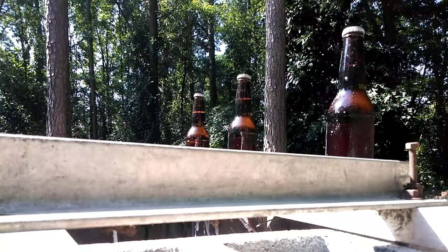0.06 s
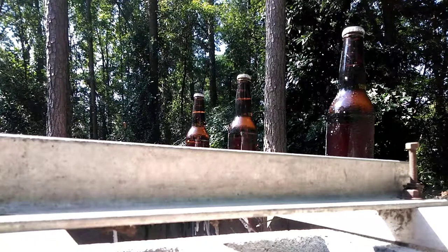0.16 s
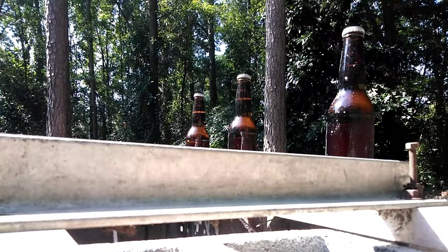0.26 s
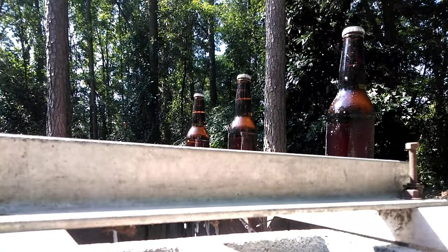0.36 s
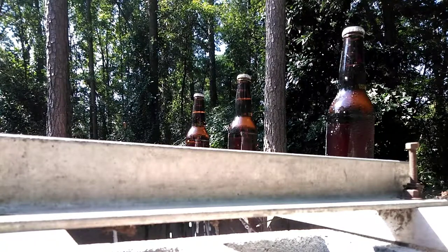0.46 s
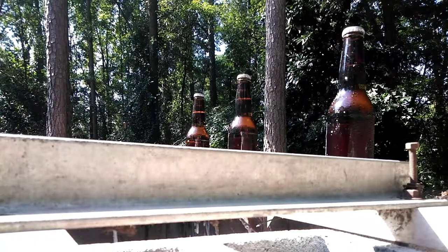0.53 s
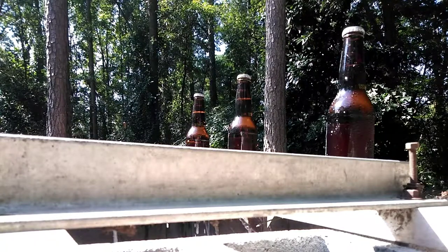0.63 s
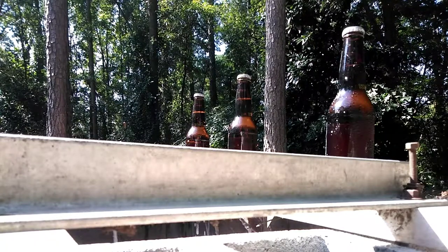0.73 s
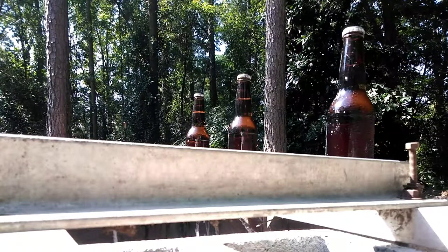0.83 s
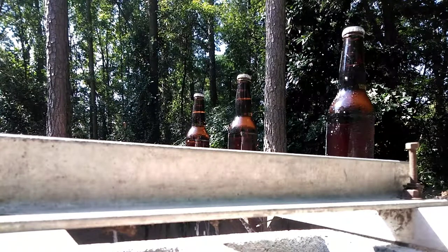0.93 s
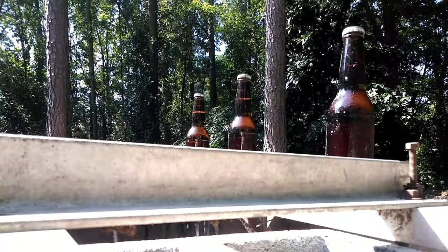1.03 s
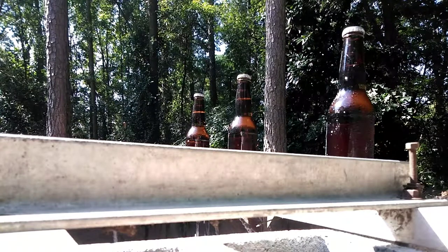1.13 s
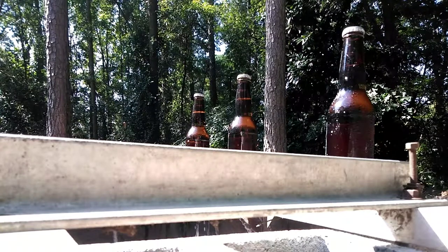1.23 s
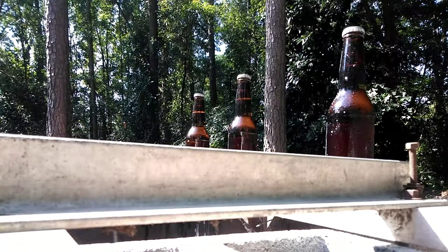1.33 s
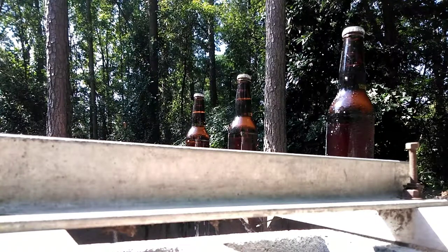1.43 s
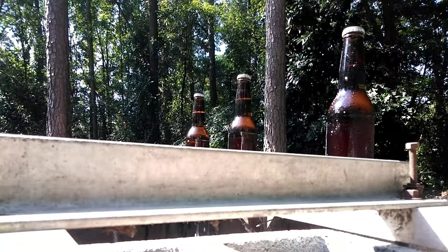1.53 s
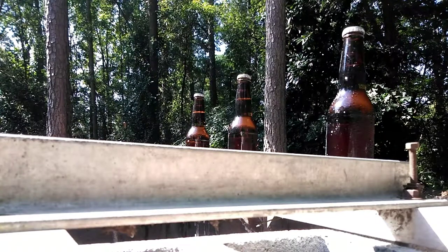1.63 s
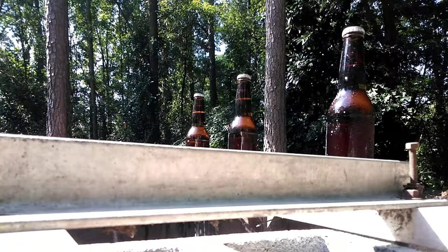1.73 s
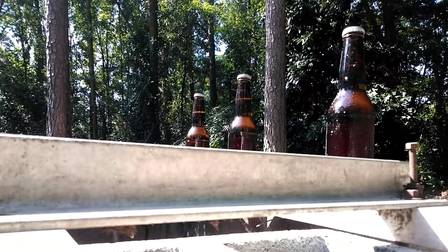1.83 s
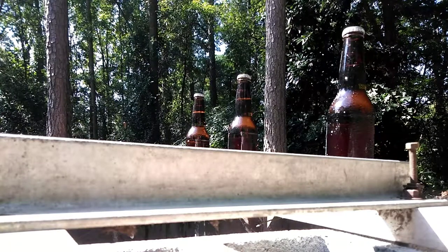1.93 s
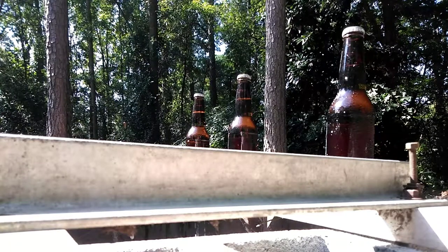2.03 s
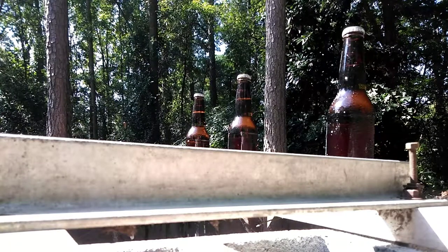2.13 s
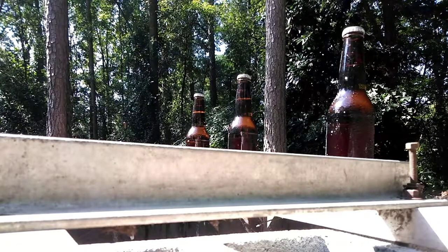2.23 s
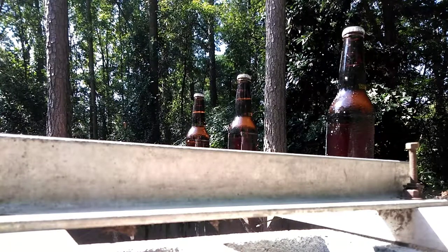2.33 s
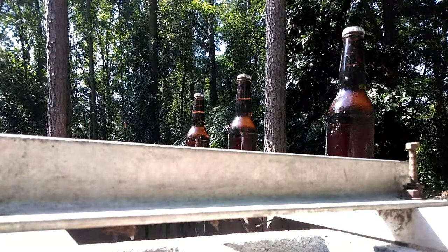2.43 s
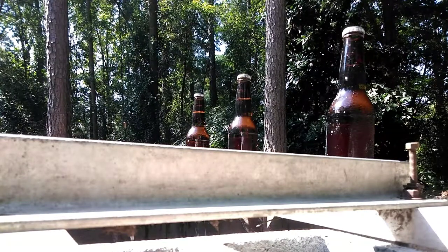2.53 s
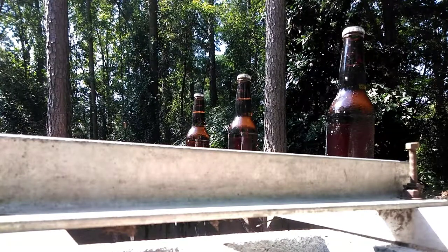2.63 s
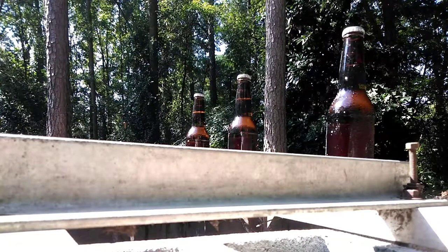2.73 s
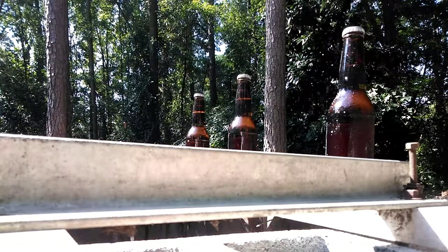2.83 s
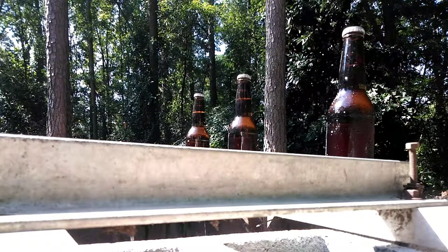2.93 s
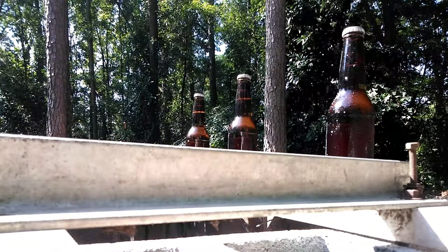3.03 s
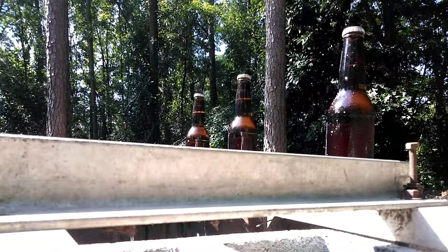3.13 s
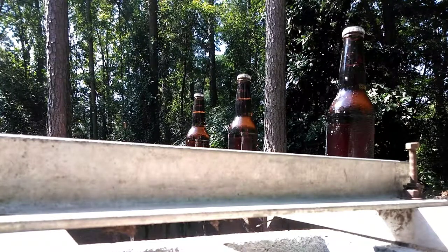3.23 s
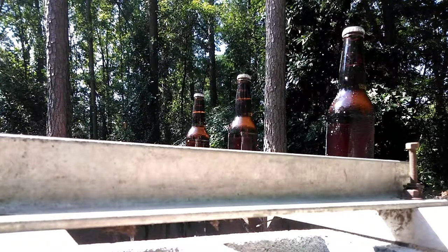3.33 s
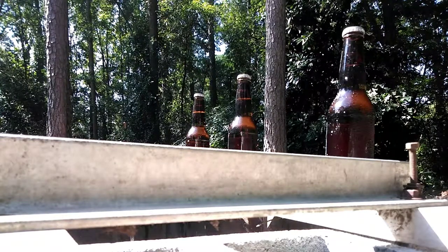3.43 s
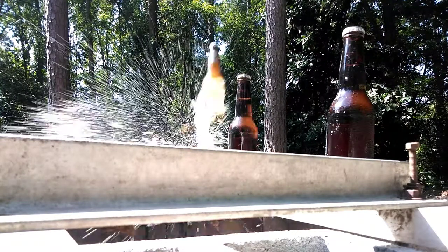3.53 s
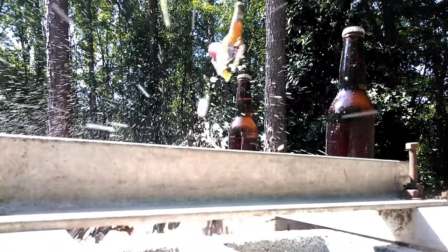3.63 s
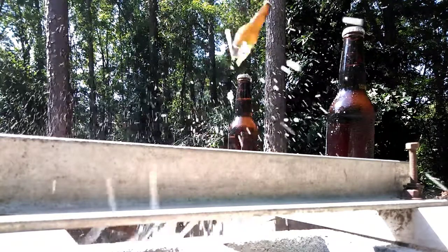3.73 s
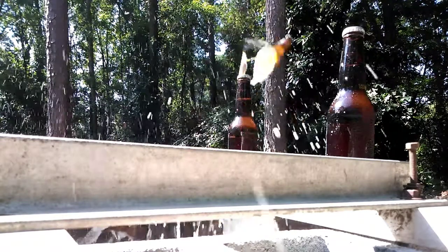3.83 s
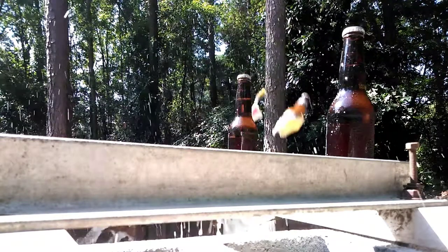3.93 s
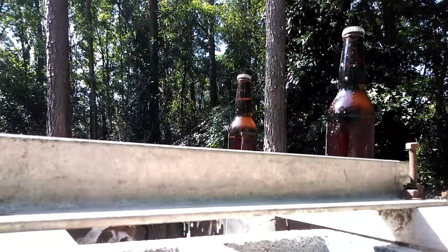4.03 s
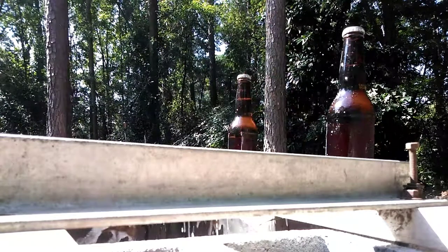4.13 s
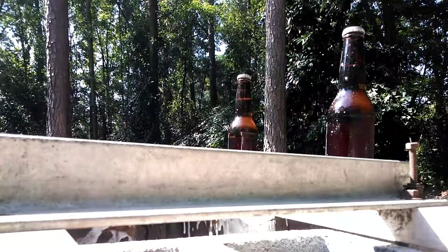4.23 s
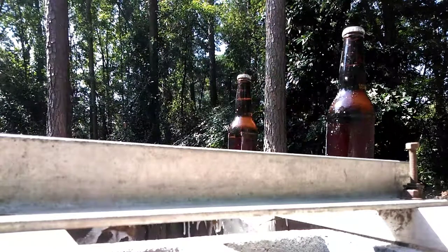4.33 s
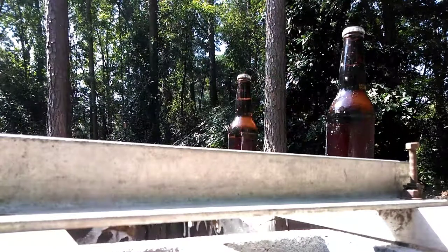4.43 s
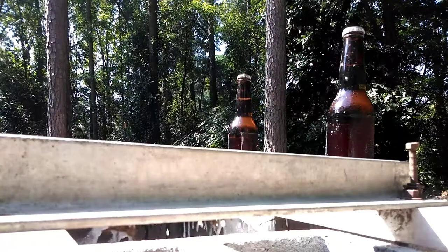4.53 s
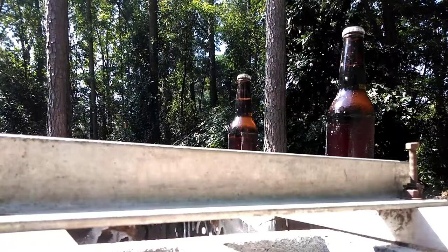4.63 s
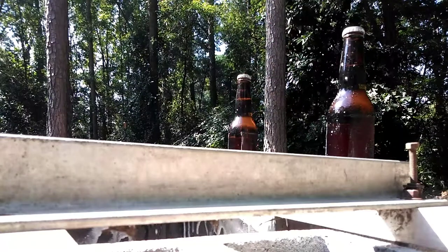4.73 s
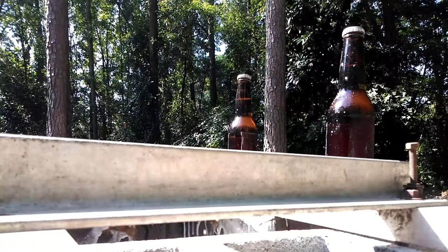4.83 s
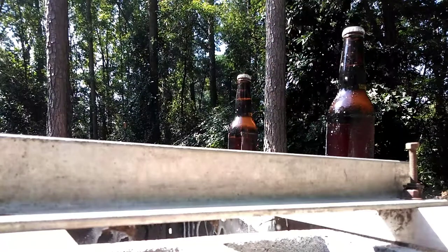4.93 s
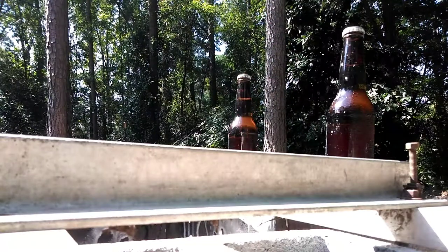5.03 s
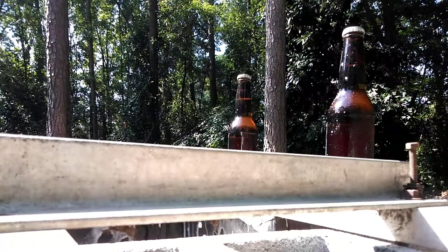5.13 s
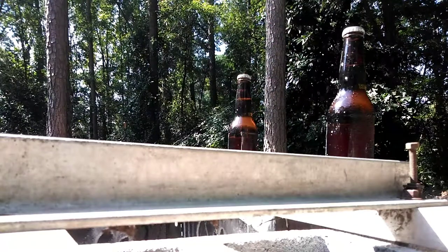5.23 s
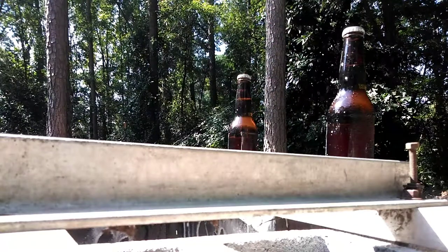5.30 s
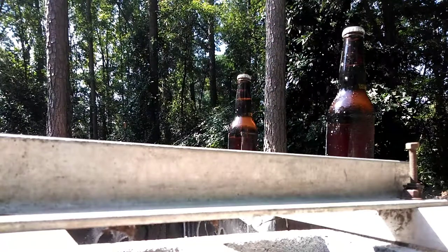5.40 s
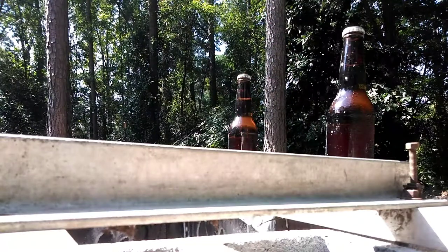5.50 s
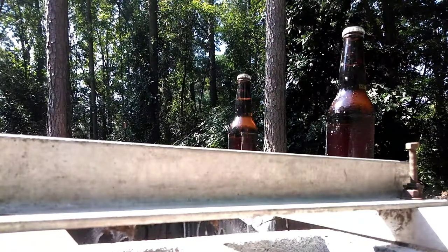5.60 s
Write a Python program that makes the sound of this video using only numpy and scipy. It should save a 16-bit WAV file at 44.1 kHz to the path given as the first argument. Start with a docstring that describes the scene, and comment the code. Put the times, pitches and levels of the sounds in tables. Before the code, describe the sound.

In a quiet wood with faint hum, distant traffic and thin cicadas, an air pistol snaps at about 2.4 seconds and echoes off the trunks. A second shot follows at 3.65 and a full glass bottle bursts at once, loud, bright and wet. Shards rain down, the neck clacks at 4.35, a thick piece bounces at 4.5, and one last tick comes near the end. Close stereo microphone near the bottles, briefly overloaded on the right.

```python
"""In a wood, an air pistol fires twice: the first pellet misses, the second bursts a full glass bottle on a rail.
Gas puffs are fading noise. The burst is a hail of tiny clicks plus cracks, ringing glass, splashes and thuds.
Tree trunks answer with a scattered noise echo, and the blast briefly pins the right microphone capsule.
Behind lie filtered noise for air, far traffic, leaves and cicadas, a hum of wavering sines, and soft distant knocks.
"""
import sys
import numpy as np
from scipy import signal
from scipy.fft import rfft, irfft
from scipy.io import wavfile
from scipy.ndimage import uniform_filter1d

SR = 44100
rng = np.random.default_rng(int(sys.argv[2]) if len(sys.argv) > 2 else 0)


def bounce(signal):
    """Save signal as a 16-bit WAV file at the path given by the first command-line argument."""
    frames = np.transpose(np.atleast_2d(signal))
    limited = np.clip(frames, -1, 1)
    pcm = np.round(limited * 32767).astype(np.int16)
    wavfile.write(sys.argv[1], SR, pcm)


N = 249606
T = np.arange(N) / SR  # time [s]
SPAN = SR // 4  # samples of a short sound
SIDES = np.array([[.5], [-.5]])  # shares a left-minus-right level between the two sides

# pistol shots: (time [s], right capsule free again after [s], level change building up until then [dB])
SHOTS = [(2.3712, .039, 12), (3.6512, .035, -12)]
# gas blast and near reflections: (time after the shot [s], level [dB], fall by 60 dB [s], left minus right [dB])
BLAST = [(0, -12, .02, -10), (.0035, 3, .025, 0), (.0065, 2, .03, 0), (.011, 2, .03, 0),
         (.0172, 3, .015, 0), (.020, -5, .06, 0), (.123, -13, .008, 6), (.045, -9, .02, 3),
         (.08, -14, .015, -2), (.147, -24, .015, 2)]
# tone of the blast: (frequency [Hz], relative level per hertz [dB])
BLAST_TONE = [(60, -31.5), (150, -20.5), (500, -10), (1100, -10), (2400, -11), (4500, -10.5), (7500, -9),
              (8700, -4.5), (11000, -13), (14800, -16.5), (16300, -35)]
SHOT_DB = -5  # added to every blast level

# hail of bursting and raining glass: (time [s], level before it sings [dB], left minus right [dB])
SHATTER = [(3.685, -48.5, 2), (3.73, -18.5, 0.5), (3.8, -26.5, -14.5), (3.825, -15, -14), (3.863, -32, -1),
           (3.943, -45.5, 0), (4.143, -50, -9), (4.199, -61, -9.5), (4.34, -48.5, -3)]
# tone of the glass clicks: (frequency [Hz], relative level per hertz [dB])
SHATTER_TONE = [(59, -57), (100, -26), (284, -11), (586, -12), (652, -23), (1040, -14.5), (1260, -3),
                (1560, -22.5), (4940, -6), (5270, -1), (8790, 4.5), (15000, -18.5), (16300, -34)]
BURST_CLICKS_PER_S, RAIN_CLICKS_PER_S, CLICK_T60_S = 1500, 1000, .0003
# drink splashing: (time [s], level [dB])
SPLASH = [(3.685, -34.5), (3.731, -19), (3.8, -50), (3.863, -31), (3.943, -44.5), (4.07, -69), (4.143, -51),
          (4.2, -103.5), (4.34, -83.5)]
# ringing modes of the bottle glass: (frequency [Hz], level [dB], fall by 60 dB [s])
BOTTLE_MODES = [(2336, -17.5, .1), (2600, -19.5, .08), (3080, -23.5, .08), (3420, -24, 0.2),
                (4080, -18.5, 0.2), (4397, -20.5, .14), (4940, -12.5, .2), (5580, -19, .1),
                (5990, -12.5, .13), (7250, -15.5, .12), (7890, -13.5, .1), (8680, -0.5, .1),
                (9426, -10, .08), (10880, -4, 0.065), (14100, -12.5, 0.052)]
# while it bursts, glass sings at those frequencies: gain of modes, gain of plain clatter, width of a mode
SING_DB, CLATTER_DB, SING_WIDTH_HZ = 8, -14, 55
SING_UNTIL_S, SING_LONGER_S = 3.93, .01  # only cracks before this time and longer than this sing
# loudest cracks of the burst: (time [s], level before tone [dB], fall by 60 dB [s], left minus right [dB])
CRACKS = [(3.6874, -4, 0.0063, 10), (3.6933, -4, 0.0119, 13.5), (3.7012, -9.5, 0.0164, 8.5),
          (3.715, -11.5, 0.021, 5.5), (3.734, -2, 0.053, 6), (3.7482, -7.5, 0.0236, -0.5),
          (3.7637, -2, 0.0091, 4.5), (3.7785, 5, 0.00543, 3.5), (3.7832, -4.5, 0.01115, 6.5),
          (3.7933, -9, .022, -0.5), (3.7991, -4, 0.014, -2.5), (3.8158, -4.5, 0.023, -3),
          (3.8215, -6, 0.024, -0.5), (3.8281, -8, 0.026, -1), (3.8415, -5, 0.0063, 0)]
# lesser cracks at random: earliest, latest, level of the loudest, fall by 60 dB
LESSER_FROM_S, LESSER_TO_S, LESSER_DB, LESSER_T60_S = 3.7, 3.85, -13.5, 0.016
# the full bottle gives each crack a low part that thins as it empties
WET_DB, WET_LOSS_DB_PER_S = -27.5, 91
# shards landing: (time [s], level before tone [dB], low part [dB], fall by 60 dB [s], left minus right [dB])
LANDINGS = [(3.88, -9, -46, 0.0031, 4.5), (3.925, -19.5, -44, 0.022, 5),
            (3.9666, -20.5, -38.5, 0.0038, 3.5), (3.985, -33, -50, .006, 0.5),
            (4.021, -37.5, -58, 0.0052, -2.5), (4.0403, -36, -51.5, 0.0071, -5.5),
            (4.076, -34, -61.5, 0.0074, -1.5), (4.098, -37, -59, 0.0092, -12),
            (4.1203, -45, -51, 0.029, -15.5), (4.1445, -35.5, -59.5, 0.028, -15.5),
            (4.1903, -48, -53.5, 0.0425, -13), (4.26, -45.5, -63, 0.02487, -11),
            (4.306, -51, -66, 0.039, -3), (4.5018, -54, -36, 0.0062, 9.5), (4.5339, -25, -59, 0.06, 11.5),
            (4.5357, -19, -51.5, 0.02, 7.5), (5.4143, -30.5, -66.5, 0.017, -1.5),
            (5.418, -46, -75.5, 0.19, -3)]
# small shards: lowest and highest pitch, middle ring time, level against the hail table
TINKLE_HZ, TINKLE_T60_S, TINKLE_DB = (1841, 11550), 0.05, -5.5
# large shards struck so that they ring: (time [s], level of the mode set [dB], left minus right [dB])
RINGS = [(3.715, -22, 4.5), (3.742, -19.5, 3), (3.785, -15.5, 8.5), (3.816, -13.5, 15), (3.824, -6.5, -3.5),
         (3.836, -18.5, 9.5), (3.862, -28.5, -0.5), (3.9, -30, 7)]
# bottle neck landing and rocking: (time [s], level before tone [dB], fall by 60 dB [s], left minus right [dB])
NECK = [(4.3526, -11.5, 0.026, 7.5), (4.3566, -7, 0.014, 0), (4.363, -23, 0.097, -1.5),
        (4.386, -33, 0.019, -1)]
# tone of the neck: (frequency [Hz], relative level per hertz [dB])
NECK_TONE = [(300, -18.5), (800, -14.5), (1200, -19.5), (2100, -15), (2900, -2.5), (3500, -9), (4800, -13),
             (5700, -5.5), (6100, -6), (6600, -4), (8800, 3), (11000, -7.5), (15000, -18.5), (16300, -37)]
# thick piece bouncing on the rail:
# (time [s], level [dB], share of free ring time [ratio], brightness [dB per octave], left minus right [dB])
BOUNCES = [(4.501, -25, 0.54, 3, 8), (4.508, -29, 0.27, -8, -3), (4.5351, -25, 0.88, 4, 2.5),
           (4.547, -29.5, 1.3, -2, 0)]
# modes of a freely ringing thick piece: (frequency [Hz], level [dB], fall by 60 dB [s])
PIECE_MODES = [(1138, -13, 0.061), (1383, -3.5, 0.14), (1562, 0.5, 0.12), (1880, -5, 0.06),
               (2358, 4, 0.046), (2780, -4.5, 0.084), (2984, -8.5, 0.066), (3470, -18.5, 0.028)]
PIECE_DETUNE = .006  # typical chance shift of each mode, as a fraction of its pitch
BOUNCE_SCRAPE_DB = 9  # contact noise, added to the bounce level
# tiny splinters ringing on the rail: (time [s], level [dB], left minus right [dB])
SPLINTERS = [(3.9654, -16, -7.5), (4.128, -33, -18), (4.1465, -28.5, -11.5), (4.259, -31, -22),
             (4.458, -36, -18), (4.484, -31, -14)]
SPLINTER_HZ, SPLINTER_T60_S = 14800, 0.0325
# low thuds of shots, burst and heavy pieces:
# (time [s], level [dB], frequency [Hz], fall by 60 dB [s], left minus right [dB])
THUDS = [(2.377, -20.5, 134, 0.053, 8.5), (2.491, -27, 300, 0.025, -3.5), (2.378, -22, 170, .07, 4),
         (3.657, -22, 130, .06, 6.5), (3.687, -9, 87, 0.071, -9.5), (3.693, -6.5, 154.6, 0.067, 4),
         (3.838, -32, 485, 0.052, 2.5), (3.856, -33.5, 388, 0.049, 3.5), (3.876, -35.5, 575, 0.09, 4),
         (3.887, -27.5, 238, .04, -1), (3.8915, -27.5, 252, 0.04, 3), (3.903, -31.5, 370, .05, 0),
         (4.3525, -8.5, 490, 0.018, 3), (4.3528, -17, 755, 0.012, 1), (4.357, -15, 366, .03, -3),
         (4.356, -30, 174, 0.14, -5), (4.372, -35.5, 199, 0.09, -4), (4.39, -35, 512, 0.039, -2),
         (4.402, -36, 207, 0.036, 1.5), (4.505, -45, 514, 0.19, 7)]
# drink slapping down: (time [s], level [dB], frequency [Hz], left minus right [dB])
SLAPS = [(3.995, -35, 2759, 7), (4.043, -37.5, 800, 0.5), (4.058, -46.5, 1120, 6.5),
         (4.075, -44, 898, -2.5), (4.092, -44.5, 1040, 0), (4.105, -52, 770, 1), (4.119, -39.5, 2020, -8),
         (4.13, -36, 7170, -4.5), (4.14, -61, 1110, -1.5), (4.194, -47.5, 5230, -8.5)]
SLAP_T60_S = 0.066
# drops of drink: the span of time, loudest level at its start and end, fall by 60 dB, pitch range
DROPS_FROM_S, DROPS_TO_S, DROPS_FIRST_DB, DROPS_LAST_DB, DROP_T60_S = 4, 4.2, -39, -53, 0.0243
DROP_HZ = 499, 5060
# fine spray pattering nearby: (time [s], level [dB])
SPRAY = [(3.86, -57), (3.93, -42), (4.0, -50), (4.15, -53), (4.25, -58), (4.34, -57), (4.4, -52),
         (4.5, -57), (4.6, -58), (4.72, -73)]
SPRAY_HZ = 12440, 15600

# echo of the trunks before it builds and thins: (frequency [Hz], level [dB], fall by 60 dB [s])
WOOD = [(150, -24, 0.87), (500, -12.5, 0.21), (1550, -17.5, 0.36), (2800, -15.5, 0.48), (4073, -14, 0.5),
        (5830, -12.5, 0.57), (7300, -11.5, 0.77), (9350, -9.5, 0.34), (11400, -10, 0.28), (14700, -11, 0.5),
        (15000, -8.5, 0.36)]
# side from which the echo arrives: (time after the sound [s], left minus right [dB])
ECHO_PAN = [(0, -0.5), (.04, -0.5), (.108, 1.5), (.125, -3.5), (.17, -4)]
# the echo builds until the main stand of trunks answers, then thins down to a lowest level
NEAREST_DB, STAND_S, STAND_DB, THIN_DB_PER_S, THINNEST_DB = -8, 0.034, 3, 20.5, -0.2
LUMPY_DB, PATCHY_DB = 6, 5  # chance swing for uneven spacing of trunks, and of whole clumps
# past the far edge of the near trunks the lower echo drops away
EDGE_S, EDGE_HZ, EDGE_DB = 0.12, 2600, -5.5
# the pistol stands further off than the glass, so more of it is echo
SHOT_ECHO_DB, GLASS_ECHO_DB = -20, -31

# soft far knocks: (time [s], level before the band filter [dB], left minus right [dB])
KNOCKS = [(0.62, -48.5, -7), (0.666, -55, -4), (1.392, -46.5, 3), (1.998, -54, -11), (2.725, -44.5, 3),
          (3.572, -44.5, 5), (4.958, -50.5, -1)]
KNOCK_HZ, KNOCK_T60_S = 460, .045
# far traffic swelling: (time [s], level [dB])
TRAFFIC = [(0, -74), (.98, -68.5), (1.3, -67), (1.45, -61), (1.55, -62.5), (1.68, -60), (1.85, -64),
           (2.14, -66), (3.4, -63), (4.95, -63.5), (5.66, -65.5)]
# leaf swishes climbing as they swell: (time of the peak [s], peak setting [dB], frequency at the peak [Hz])
LEAVES = [(.26, -71.5, 2613), (.56, -69.5, 3385), (.87, -69, 3294)]
# swell before the peak, fall after it, climb in pitch, roughness of the noise
STIR_DB_PER_S, STIR_END_DB_PER_S, STIR_HZ_PER_S, STIR_WIDTH_HZ = 21, 250, 5300, 690
# hum partials: (middle frequency [Hz], middle level [dB])
HUM = [(59.2, -55.5), (91.5, -74), (118.4, -68.5), (177.6, -73.5), (242.2, -81.5)]
CICADA_HZ, CICADA_WIDTH_HZ, CICADA_DB = 7106, 780, -65
# tone of the still air: (frequency [Hz], relative level per hertz [dB])
AIR_TONE = [(25, -15.5), (45, -10), (62, -6), (90, -9), (160, -19.5), (650, -23), (1560, -34.5),
            (3100, -34.5), (5250, -43), (8500, -37), (10500, -43.5), (14500, -44.5), (16300, -64.5)]
AIR_DB = -59
# how alike left and right air are: (frequency [Hz], likeness, below 0 counting as 0 [0-1])
LIKENESS = [(60, 1), (130, 1), (290, 0.8), (640, 0.7), (1410, -0.1), (3100, 0.5), (6820, 0), (15000, 0.03)]
LEFT_LATE_S = .0005  # air, traffic, leaves and hum reach the right port first

# left and right sound port resonances: (frequency [Hz], width [Hz], lift [dB])
PORTS = [(9054, 800, 6.5), (7700, 2500, 3)]
# right capsule under the blast, each state lasting to the next row:
# (time after the shot [s], offset before it drains [share of full scale], sound let through [dB])
PINNED = [(.0045, .45, -4), (.0056, -.25, -20), (.0102, -.2, -7), (.0114, .3, -22), (.0168, .1, -7),
          (.0186, -.05, -28)]
COUPLING_HZ, RUMBLE_CUT_HZ, TOP_HZ = 40, 45, 15900


def undb(db):
    """Turn decibels into a gain."""
    return 10 ** (np.asarray(db) / 20)


def unit(x):
    """Scale to an rms of 1."""
    return x / np.sqrt(np.mean(x ** 2))


def on_log(hz, table, column=1):
    """Read a table column by straight lines along log frequency."""
    table = np.array(table, float)
    return np.interp(np.log(np.maximum(hz, 1)), np.log(table[:, 0]), table[:, column])


def colour(x, table):
    """Shape the tone by a table, keeping the average power of white noise."""
    gain = undb(on_log(np.fft.rfftfreq(N, 1 / SR), table))
    return irfft(rfft(x) * unit(gain), N)


def high_pass(x, order, hz):
    """Remove what lies below a frequency."""
    return signal.sosfilt(signal.butter(order, hz, "high", fs=SR, output="sos"), x)


def band(x, lo_hz, hi_hz):
    """Keep what lies between two frequencies."""
    sos = signal.butter(2, [lo_hz, min(hi_hz, .45 * SR)], "band", fs=SR, output="sos")
    return signal.sosfilt(sos, x)


def fade(t60, size=SPAN):
    """Decay that passes -60 dB at t60 seconds."""
    return undb(-60 * T[:size] / t60)


def walk(rate):
    """Slow smooth wandering around zero, with about `rate` new values a second."""
    k = int(SR / rate)
    steps = np.repeat(rng.standard_normal(N // k + 1), k)
    return 0.54 * uniform_filter1d(uniform_filter1d(steps, k), k)[:N]


def add(out, s, sound, db, pan_db):
    """Place a mono or stereo sound at a time, level and side."""
    i = int(s * SR)
    sound = (sound * undb(db + pan_db * SIDES))[:, :N - i]
    out[:, i:i + sound.shape[1]] += sound


def puff(t60, rise=.0005):
    """Decaying noise, unrelated at the two ports."""
    return rng.standard_normal((2, SPAN)) * fade(t60) * np.minimum(T[:SPAN] / rise, 1)


def ring(modes, rough_db):
    """Damped partials with chance phases; contact makes each one flutter."""
    out, size = 0, 2 * SPAN
    for hz, db, t60 in modes:
        turn = rng.random((2, 1))
        flutter = uniform_filter1d(rng.standard_normal((2, size)), 200) * np.sqrt(200)
        tone = np.sin(2 * np.pi * (hz * T[:size] + turn))
        out = out + undb(db + rough_db * flutter) * fade(t60, size) * tone
    return out * np.minimum(T[:size] / .001, 1)


def bump(hz, t60, skirt_db=-3.5, rise_cycles=.5):
    """Soft blow: one round partial with a rough skirt of noise."""
    tone = -np.sin(2 * np.pi * hz * T[:SPAN])
    skirt = undb(skirt_db) * unit(band(rng.standard_normal((2, SPAN)), hz / 1.6, hz * 1.8))
    return (tone + skirt) * fade(t60) * np.minimum(T[:SPAN] * hz / rise_cycles, 1)


def pistol():
    """Each shot: gas puff of fading noise, then its near reflections."""
    out = np.zeros((2, N))
    for s, *_ in SHOTS:
        for late, db, t60, pan_db in BLAST:
            add(out, s + late, puff(t60), SHOT_DB + db, pan_db)
    return colour(out, BLAST_TONE)


def sing(x):
    """Let a clatter excite the resonant modes of the bottle."""
    f = np.fft.rfftfreq(N, 1 / SR)
    modes = sum(1 / (1 + 2j * (f - hz) / SING_WIDTH_HZ) for hz, *_ in BOTTLE_MODES)
    return irfft(rfft(x) * (undb(CLATTER_DB) + undb(SING_DB) * modes), N)


def hail_and_splash():
    """Random glass clicks sing during the burst, then rain plainly; their middle band is the drink."""
    s, *columns = np.transpose(SHATTER)
    db, pan_db = (np.interp(T, s, c) for c in columns)
    on = (T > s[0]) * np.clip((s[-1] - T) / 0.0145, 0, 1)
    bursting = T < SING_UNTIL_S
    chance = np.where(bursting, BURST_CLICKS_PER_S, RAIN_CLICKS_PER_S) / SR
    clicks = (rng.random(N) < chance) / np.sqrt(chance)
    clicks = clicks * rng.standard_normal((2, N)) * undb(2 * rng.exponential(size=N))
    grain = fade(CLICK_T60_S, size=128) * rng.standard_normal(128)
    clicks = signal.lfilter(grain, 1, clicks)
    hail = unit(colour(clicks, SHATTER_TONE)) * undb(db + 2.5 * walk(80))
    splash_db = np.interp(T, *np.transpose(SPLASH)) + 4 * walk(50)
    splash = undb(splash_db) * unit(band(clicks, 500, 3000))
    return on * (sing(hail * bursting) + hail * ~bursting + splash) * undb(pan_db * SIDES)


def bottle_cracks(count):
    """List the loud cracks and random lesser ones, with low parts that thin as the bottle empties."""
    lesser = []
    for when, size, side in rng.random((count, 3)):
        s = LESSER_FROM_S + (LESSER_TO_S - LESSER_FROM_S) * when
        lesser.append((s, LESSER_DB - 6 * size, LESSER_T60_S, 8 * (side - .4)))
    rows = []
    for s, db, t60, pan_db in CRACKS + lesser:
        low_db = WET_DB - WET_LOSS_DB_PER_S * (s - CRACKS[0][0])
        rows.append((s, db, low_db, t60, pan_db))
    return rows


def cracks_and_landings():
    """Noise puffs with a low part; the longer ones of the burst excite the bottle modes."""
    plain, sung, low = np.zeros((3, 2, N))
    for s, db, low_db, t60, pan_db in bottle_cracks(count=6) + LANDINGS:
        sings = s < SING_UNTIL_S and t60 > SING_LONGER_S
        add(sung if sings else plain, s, puff(t60), db, pan_db)
        add(low, s, band(puff(t60), 532, 2800), low_db, pan_db)
    return low + colour(plain + sing(sung), SHATTER_TONE)


def tinkle(count):
    """Many small shards, each one short ring of its own pitch, thickest early on."""
    out = np.zeros((2, N))
    s, db, pan_db = np.transpose(SHATTER)
    low_hz, high_hz = TINKLE_HZ
    for when, pitch, size, side in rng.random((count, 4)):
        start = s[0] + (s[-1] - s[0]) * when ** 1.3
        hz = low_hz * (high_hz / low_hz) ** pitch
        decay = fade(TINKLE_T60_S * (.5 + size), size=SPAN // 2)
        note = decay * np.sin(2 * np.pi * hz * T[:SPAN // 2])
        note_db = np.interp(start, s, db) + TINKLE_DB - 10 * size + 6 * pitch
        add(out, start, note, note_db, np.interp(start, s, pan_db) + 16 * (side - .5))
    return out


def ringing_shards():
    """Large shards ring at the damped modes of the bottle."""
    out = np.zeros((2, N))
    for s, db, pan_db in RINGS:
        add(out, s, ring(BOTTLE_MODES, rough_db=4.5), db, pan_db)
    return out


def neck():
    """The neck lands as puffs of noise in its own tone."""
    out = np.zeros((2, N))
    for s, db, t60, pan_db in NECK:
        add(out, s, puff(t60), db, pan_db)
    return colour(out, NECK_TONE)


def bouncing_piece():
    """Each bounce lands on another face, so its damped modes shift in pitch, brightness and length."""
    out = np.zeros((2, N))
    for s, db, share, bright_db, pan_db in BOUNCES:
        modes = []
        for hz, mode_db, t60 in PIECE_MODES:
            struck_hz = hz * (1 + PIECE_DETUNE * rng.standard_normal())
            tilt_db = bright_db * np.log2(hz / PIECE_MODES[2][0])
            modes.append((struck_hz, mode_db + tilt_db, t60 * share))
        add(out, s, ring(modes, rough_db=4.5), db, pan_db)
    return out


def bounce_scrapes():
    """Short band of contact noise at every bounce."""
    out = np.zeros((2, N))
    for s, db, *_, pan_db in BOUNCES:
        scrape = band(band(puff(0.022), 1200, 3600), 860, 4000)
        add(out, s, scrape, db + BOUNCE_SCRAPE_DB, pan_db)
    return out


def splinters():
    """Tiny close pieces: two high, very short partials each."""
    out = np.zeros((2, N))
    for s, db, pan_db in SPLINTERS:
        hz = SPLINTER_HZ * (1 + 0.0058 * rng.standard_normal())
        modes = [(hz, 0, SPLINTER_T60_S), (hz * 1.025, -5, SPLINTER_T60_S / 2)]
        add(out, s, ring(modes, rough_db=3.5), db, pan_db)
    return out


def thuds():
    """Low soft blows with a weak rough skirt."""
    out = np.zeros((2, N))
    for s, db, hz, t60, pan_db in THUDS:
        add(out, s, bump(hz, t60, skirt_db=-9, rise_cycles=.9), db, pan_db)
    return out


def slaps():
    """Drink hits as damped partials with a strong rough skirt."""
    out = np.zeros((2, N))
    for s, db, hz, pan_db in SLAPS:
        add(out, s, bump(hz, SLAP_T60_S, skirt_db=1.5), db, pan_db)
    return out


def drops(count):
    """Scattered short splats, each a soft blow of its own pitch."""
    out = np.zeros((2, N))
    for when, pitch, size, side in rng.random((count, 4)):
        start = DROPS_FROM_S + (DROPS_TO_S - DROPS_FROM_S) * when
        hz = DROP_HZ[0] * (DROP_HZ[1] / DROP_HZ[0]) ** pitch
        db = DROPS_FIRST_DB + (DROPS_LAST_DB - DROPS_FIRST_DB) * when - 10 * size
        add(out, start, bump(hz, DROP_T60_S), db, 14 * (side - .5))
    return out


def spray():
    """Tiny droplets and grit: bright random ticks of very uneven size."""
    sizes = rng.standard_normal((2, N)) * undb(2.2 * rng.exponential(size=(2, N)))
    ticks = (rng.random((2, N)) < .15) * sizes
    db = np.interp(T, *np.transpose(SPRAY), left=-200, right=-200) + 3 * walk(40)
    return unit(band(ticks, *SPRAY_HZ)) * undb(db)


def wood(x):
    """Scattered echo from many trunks: noise bands, each with its own decay, spread every sound in time."""
    t, echo = T[:SR], 0
    for hz in 100 * 2 ** np.arange(0, 7.6, .5):  # half-octave bands
        decay = undb(on_log(hz, WOOD) - 60 * t / on_log(hz, WOOD, column=2))
        edge = undb(EDGE_DB * (hz < EDGE_HZ) * np.clip((t - EDGE_S) / .01, 0, 1))
        uneven = undb(LUMPY_DB * walk(60)[:SR] + PATCHY_DB * walk(18)[:SR])
        noise = band(rng.standard_normal((2, SR)), hz / 2 ** .25, hz * 2 ** .25)
        echo = echo + decay * edge * uneven * noise
    building_db = NEAREST_DB + (STAND_DB - NEAREST_DB) * t / STAND_S
    thinning_db = np.maximum(STAND_DB - THIN_DB_PER_S * (t - STAND_S), THINNEST_DB)
    db = np.where(t < STAND_S, building_db, thinning_db)
    pan_db = np.interp(t, *np.transpose(ECHO_PAN)) * SIDES
    trunks = undb(db + pan_db + 2 * walk(300)[:SR])
    return signal.fftconvolve(x, echo * trunks, axes=1)[:, :N]


def knocks():
    """Soft distant blows, narrowed to a low band."""
    out = np.zeros((2, N))
    for s, db, pan_db in KNOCKS:
        add(out, s, band(bump(KNOCK_HZ, KNOCK_T60_S, skirt_db=-1), 260, 650), db, pan_db)
    return out


def traffic():
    """Far traffic: a band of noise that swells and wavers."""
    db = np.interp(T, *np.transpose(TRAFFIC)) + 4 * walk(18)
    return unit(band(rng.standard_normal((2, N)), 600, 1700)) * undb(db)


def leaves():
    """Leaf swishes: narrow noise glides up as it swells, then quickly falls."""
    out = 0
    for s, db, hz in LEAVES:
        pitch = np.clip(hz + STIR_HZ_PER_S * (T - s), 100, hz)
        rough = unit(uniform_filter1d(rng.standard_normal((2, N)), int(SR / STIR_WIDTH_HZ)))
        slope = np.where(T < s, STIR_DB_PER_S, STIR_END_DB_PER_S)
        tone = np.sin(2 * np.pi * np.cumsum(pitch) / SR)
        out = out + undb(db - slope * abs(T - s)) * rough * tone
    return out


def hum():
    """Steady low partials whose level and pitch waver a little."""
    out = np.zeros(N)
    for hz, db in HUM:
        level = np.sqrt(2) * undb(db + 1.5 * walk(21))
        pitch = hz * (1 + 0.008 * walk(3.6))
        out += level * np.sin(2 * np.pi * np.cumsum(pitch) / SR)
    return out


def cicadas():
    """A narrow high band of noise with a fluttering level."""
    edges = CICADA_HZ - CICADA_WIDTH_HZ / 2, CICADA_HZ + CICADA_WIDTH_HZ / 2
    return unit(band(rng.standard_normal((2, N)), *edges)) * undb(CICADA_DB + 2.9 * walk(45))


def air():
    """Gently wandering noise whose bass is largely shared by both ports."""
    like = np.clip(on_log(np.fft.rfftfreq(N, 1 / SR), LIKENESS), 0, 1)
    mid, side = rfft(colour(rng.standard_normal((2, N)), AIR_TONE))
    mid, side = mid * np.sqrt((1 + like) / 2), side * np.sqrt((1 - like) / 2)
    stereo = irfft(np.array([mid + side, mid - side]), N)
    return stereo * undb(AIR_DB + 0.58 * walk(4.6))


def outdoors():
    """Quiet background; all but the cicadas arrive later on the left."""
    out = air() + traffic() + leaves() + hum()
    out[0] = np.roll(out[0], int(LEFT_LATE_S * SR))
    return out + cicadas()


def scene():
    """Shots and glass with their echo, over the quiet wood."""
    shots = pistol()
    glass = hail_and_splash() + cracks_and_landings() + tinkle(count=350) + neck()
    glass += bounce_scrapes() + thuds() + slaps() + drops(count=45)
    echoing = glass + knocks()
    echo = wood(undb(SHOT_ECHO_DB) * shots + undb(GLASS_ECHO_DB) * echoing)
    close = ringing_shards() + bouncing_piece() + splinters() + spray()  # sends nothing to the echo
    return shots + echoing + close + echo + outdoors()


def record(dry):
    """Port resonances, pinned right capsule, bass cut, clipping and top cut."""
    out = []
    for x, (hz, width, lift_db) in zip(dry, PORTS):
        out.append(x + (undb(lift_db) - 1) * band(x, hz - width / 2, hz + width / 2))
    out = np.array(out)
    through_db, offset = np.zeros(N), np.zeros(N)
    for s, free, back_db in SHOTS:
        for start, shift, db in PINNED:
            held = (T >= s + start) & (T < s + free)
            through_db[held], offset[held] = db, shift
        # the level slides during the last state only
        through_db += held * back_db * (T - s - start) / (free - start)
    # the offset drains through the coupling capacitor
    offset = high_pass(uniform_filter1d(offset, 40), 1, COUPLING_HZ)
    out[1] = out[1] * undb(uniform_filter1d(through_db, 30)) + offset
    out = np.clip(high_pass(out, 2, RUMBLE_CUT_HZ), -.9, .9)
    top_cut = signal.ellip(8, .2, 75, TOP_HZ, fs=SR, output="sos")
    return np.clip(signal.sosfilt(top_cut, out), -1, 1)


dry = scene()
out = record(dry)
bounce(out)
```